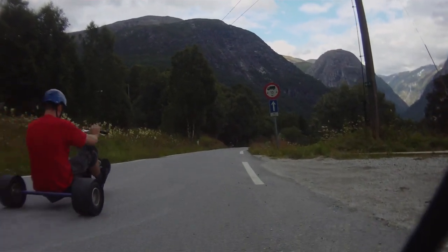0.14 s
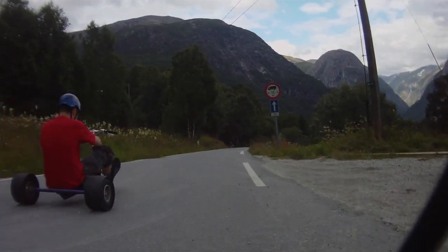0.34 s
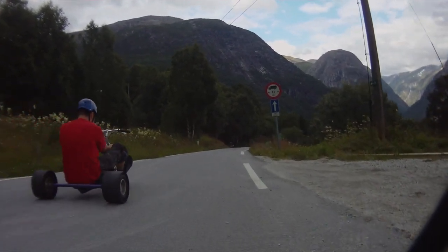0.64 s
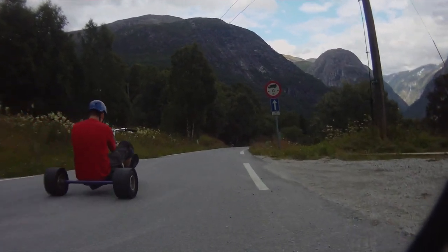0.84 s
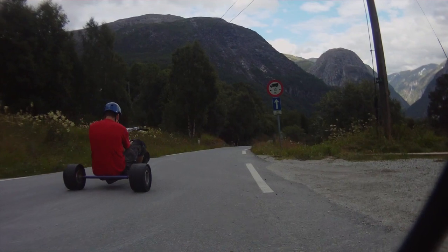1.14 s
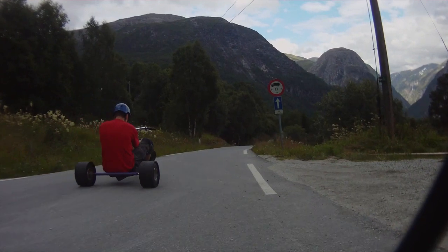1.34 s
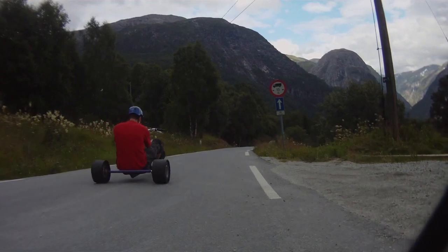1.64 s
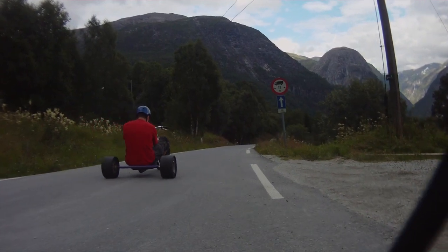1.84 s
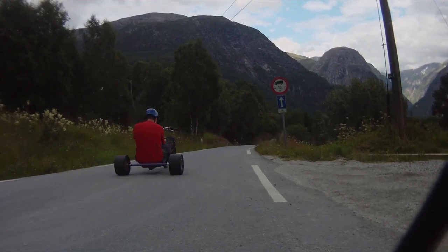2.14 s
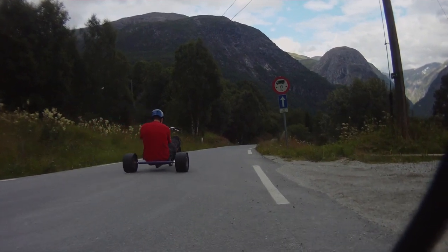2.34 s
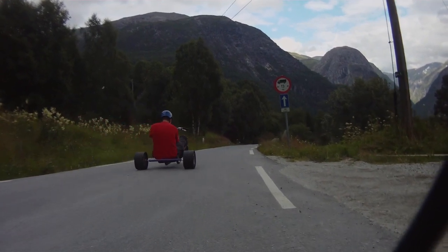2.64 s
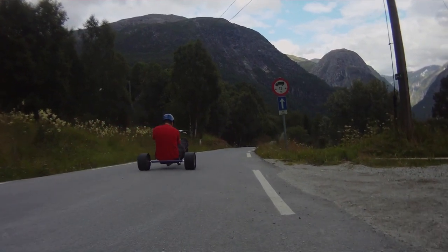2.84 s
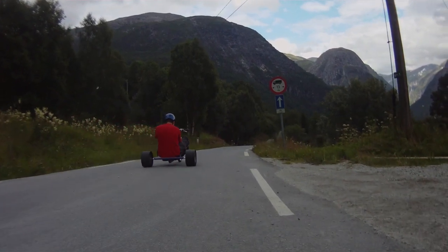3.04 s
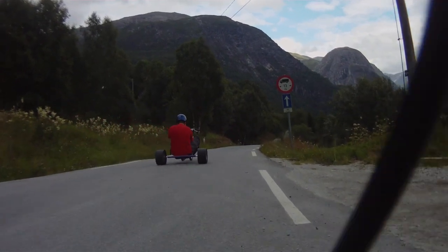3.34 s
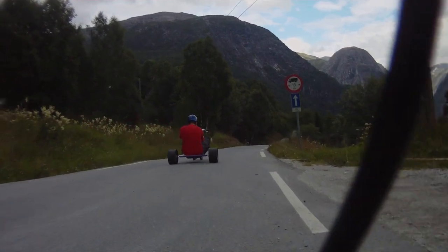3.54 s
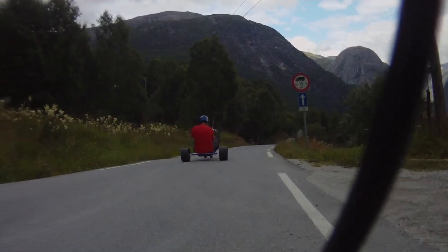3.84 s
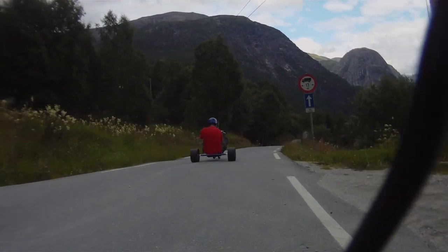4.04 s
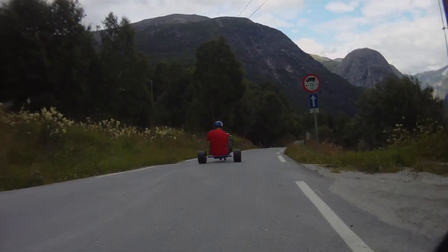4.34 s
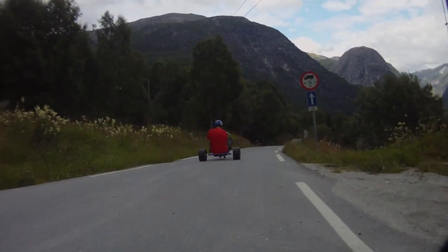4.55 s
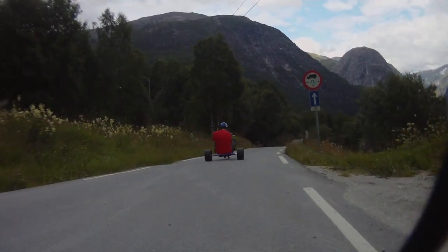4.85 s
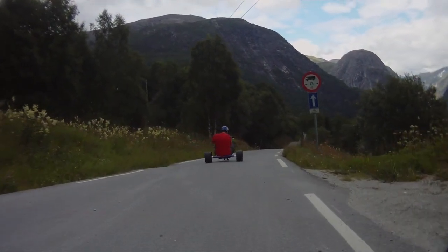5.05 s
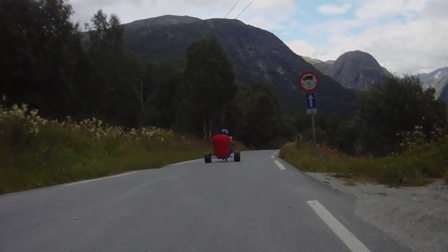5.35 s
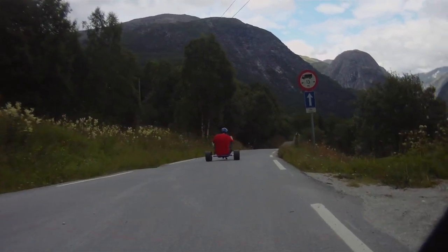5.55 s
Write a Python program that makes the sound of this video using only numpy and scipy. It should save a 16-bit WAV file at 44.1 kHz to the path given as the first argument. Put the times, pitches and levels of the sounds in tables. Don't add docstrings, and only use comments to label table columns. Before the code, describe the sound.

Close to the microphone, a loose camera rattles in a plastic housing on a small cart: dull knocks, middle-pitched clacks and bright ticks over fine buzz. Another cart's hollow plastic wheels ring ahead, fading by three seconds. After a burst near 3.6 seconds and a brief lull, the rattle turns loud and dense from four seconds, with hard snaps, above low frame thuds. Outdoors, dry, practically mono.

```python
import sys
import numpy as np
from scipy import signal
from scipy.fft import rfft, irfft
from scipy.io import wavfile
from scipy.ndimage import uniform_filter1d, map_coordinates

SR = 44100
rng = np.random.default_rng(int(sys.argv[2]) if len(sys.argv) > 2 else 0)


def nominal_scale(level):
    x = np.asarray(level, float) / 20
    return 10 ** x


def waveform_to_disk(signal):
    frames = np.transpose(np.atleast_2d(signal))
    scaled = np.clip(frames, -1, 1) * 32767
    samples = np.round(scaled).astype(np.int16)
    wavfile.write(sys.argv[1], SR, samples)


N = 251370
HIT = 3000


def rms_one(x):
    return x / np.sqrt(np.mean(x ** 2) + 1e-20)


def over_time(table):
    s, level = np.transpose(table)
    return np.interp(np.arange(N) / SR, s, level)


def drift(rate):
    r = np.exp(-80 * np.pi * rate / SR)
    noise = rng.standard_normal(N // 40 + 2002)
    slow = signal.lfilter([1], [1, -2 * r, r * r], noise)[2000:]
    return np.interp(np.arange(N) / 40, np.arange(len(slow)), rms_one(slow))


def resonate(x, hz, width_hz):
    r = np.exp(-np.pi * width_hz / SR)
    ring = [1, -2 * r * np.cos(2 * np.pi * hz / SR), r * r]
    return signal.lfilter(np.array([1, 0, -1]) * (1 - r * r) / 2, ring, x + 1e-18)


def between(x, low_hz, high_hz):
    return signal.sosfilt(signal.butter(3, [low_hz, high_hz], "band", fs=SR, output="sos"), x)


def body(x, modes, spread_db=0.):
    luck = rng.standard_normal((len(x), len(modes)))
    total = 0
    for k, (hz, width_hz, db) in enumerate(modes):
        strength = nominal_scale(db + spread_db * luck[:, [k]])
        total = total + (-1) ** k * strength * resonate(x, hz, width_hz)
    return total


def coloured(spectrum):
    hz, db = np.transpose(spectrum)
    bins = np.arange(N // 2 + 1) * SR / N + 1
    gain = nominal_scale(np.interp(np.log(bins), np.log(hz), db))
    return rms_one(irfft(rfft(rng.standard_normal(N)) * gain, N))


def grains(shape, per_s, spread_db):
    sizes = nominal_scale(spread_db * np.minimum(rng.exponential(1, shape), 4)) * rng.choice([-1, 1], shape)
    return sizes * (rng.random(shape) < per_s / SR)


def chatter(length_ms, per_s, rise_ms):
    ms = np.arange(HIT) * 1000 / SR
    spent = ms / np.maximum(length_ms, .3)[:, None]
    settle_db, settle_longer = -16.5, 3.2
    fade = np.exp(-spent ** 1.31) + nominal_scale(settle_db) * np.exp(-spent / settle_longer)
    touches = grains((len(length_ms), HIT), per_s, spread_db=3)
    touches[:, 12] += 2.5
    return touches * (1 - np.exp(-ms / rise_ms)) * fade


def lay_out(times, hits, peak_db):
    out = np.zeros(N + HIT)
    for s, hit, db in zip(times, hits, peak_db):
        at = round(s * SR)
        out[at:at + HIT] += nominal_scale(db) * hit / np.max(np.abs(hit))
    return out[:N]


# (frequency [Hz], level [dB])
HISS_COLOUR = [(180, -28), (300, 1.5), (1540, -25), (2790, -7), (3690, -24), (15500, -29)]


def hiss():
    return nominal_scale(-62) * coloured(HISS_COLOUR)


# (time [s], level [dB])
LURCHES = [(1.93, -62), (2.75, -57), (2.98, -61), (3.59, -56), (4.09, -61), (4.21, -53), (4.32, -49),
           (4.67, -55), (5.13, -52), (5.3, -53), (5.6, -55)]


def sway_level(shake_db):
    s, db = np.transpose(LURCHES)
    late = np.arange(N) / SR - s[:, None]
    rise_s, fade_s = 0.042, 0.043
    swells = nominal_scale(db)[:, None] * np.exp(np.minimum(late / rise_s, -late / fade_s))
    bed = nominal_scale(-72 + .7 * (shake_db + 50.5))
    return bed + swells.sum(axis=0)


# (frequency [Hz], level [dB])
DRONE_COLOUR = [(35, -37), (60, -8), (102, -10), (262, -4), (355, -6.5), (450, 0.5), (580, -11),
                (990, -120)]


def rumble(shake_db):
    sway = rms_one(resonate(resonate(rng.standard_normal(N), 48, 20), 48, 36))
    drone_db = -58 + 0.89 * (shake_db + 49.5) + 3.0 * drift(30)
    return sway_level(shake_db) * sway + nominal_scale(drone_db) * coloured(DRONE_COLOUR)


# (time [s], peak level [dB], pitch [Hz])
THUDS = [(0.059, -44, 132), (0.115, -41, 285), (0.285, -47, 218), (0.459, -49, 215), (0.823, -52, 245),
         (1.097, -51, 250), (1.166, -45, 301), (1.381, -50, 301), (2.427, -47, 285), (2.696, -45, 316),
         (2.956, -44, 72.7), (3.111, -48, 175), (3.397, -46, 280), (3.639, -41.5, 304), (3.745, -44, 202),
         (3.959, -45, 250), (4.493, -42, 291), (4.872, -42, 318), (4.956, -40, 288),
         (3.098, -35, 140)]


def thuds():
    s, peak_db, hz = np.transpose(THUDS)
    pushes = chatter(np.full(len(s), 8.), per_s=900, rise_ms=3.8)
    struck = np.array([resonate(push, f, 63) for push, f in zip(pushes, hz)])
    frame_modes = [(60.4, 26, -5.0), (126, 21, -0.5), (250, 115, -6.0), (400, 190, -13)]   # Hz, width Hz, dB
    frame = body(pushes, frame_modes, spread_db=2.5)
    return lay_out(s - .003, frame + nominal_scale(4.5) * struck, peak_db + 2.5)


# (time [s], level [dB])
WHEEL_ROAR = [
    (0, -57),
    (.4, -54),
    (1.2, -53),
    (1.7, -55.5),
    (2.4, -64),
    (2.9, -72),
    (5.7, -90),
]
# (pitch [Hz], width [Hz], level [dB])
WHEEL_MODES = [(2580, 100, -6), (3710, 250, 1), (4400, 500, -10), (6000, 400, -15), (7100, 500, -17),
               (8380, 120, -20)]


def cart_ahead():
    grit = grains(N, 6000, spread_db=2.5) * nominal_scale(1.5 * drift(30))
    rings = 0
    for hz, width_hz, db in WHEEL_MODES:
        rings = rings + nominal_scale(db) * rms_one(resonate(resonate(grit, hz, width_hz), hz, width_hz))
    t = np.arange(N) / SR
    pull_away_m_s2, sound_m_s = 2.5, 343
    sent = t - pull_away_m_s2 * t ** 2 / 2 / sound_m_s
    return nominal_scale(over_time(WHEEL_ROAR)) * map_coordinates(rings, [sent * SR], order=3)


def patter(modes, per_s, clumps, low_hz, high_hz):
    touches = grains(N, per_s * nominal_scale(3 * drift(50)), spread_db=3.5) * clumps
    rings = 0
    for k, (hz, width_hz, db) in enumerate(modes):
        luck = nominal_scale(4.33 * rng.standard_normal(N))
        rings = rings + (-1) ** k * nominal_scale(db) * resonate(touches * luck, hz, width_hz)
    return rms_one(between(rings, low_hz, high_hz))


# (pitch [Hz], width [Hz], level [dB])
SHELL = [(554, 132, -1.5), (645, 74, 1), (845, 100, -3)]
MIDDLE = [(1265, 184, -7.5), (1499, 140, 2), (1600, 89, -0.5), (1944, 206, -7.5), (2207, 92, 1),
          (2530, 224, -4.5)]
UPPER = [(3106, 240, 4), (3557, 290, 1.5), (3786, 340, 1), (4202, 330, -2)]
TOP = [(4780, 590, -7.5), (5485, 130, 2), (5980, 810, -1.5), (7370, 410, -7), (8015, 300, -7.5),
       (9780, 2100, -18.5), (12600, 3700, -23)]


def buzz(shake_db):
    clumps = nominal_scale(3.0 * drift(30) + 1.3 * drift(5.2))
    shell = nominal_scale(-4.5) * patter(SHELL, 1300, clumps, 295, 1800)
    middle = nominal_scale(-5.5) * patter(MIDDLE, 1300, clumps, 830, 4160)
    upper = nominal_scale(-8.5) * patter(UPPER, 1500, clumps, 2240, 5200)
    top = nominal_scale(-16.5) * patter(TOP, 2000, clumps, 3600, 12600)
    return nominal_scale(shake_db + 0.7) * (shell + middle + upper + top)


# (start [s], end [s], level [dB])
RUBS = [(2.936, 3.05, -52.5), (3.094, 3.125, -54), (3.213, 3.57, -52), (3.556, 3.746, -66),
        (4.297, 4.587, -53.5), (4.808, 4.9, -58), (5.034, 5.24, -57)]
# (pitch [Hz], width [Hz], level [dB])
RUB_MODES = [(2300, 500, 1), (3300, 700, 1), (4900, 720, -3), (5600, 190, -9), (6340, 640, 2),
             (8600, 400, -6), (9700, 600, -9), (12500, 4000, -29)]


def rubbing():
    t = np.arange(N) / SR
    pressure = sum(nominal_scale(db) * (t > start) * (t < end) for start, end, db in RUBS)
    slips = grains((1, N), 3500, spread_db=3.0) * nominal_scale(2.5 * drift(30))
    scrape = rms_one(between(body(slips, RUB_MODES), 1500, 11200)[0])
    return uniform_filter1d(pressure, size=1300) * scrape


# (time [s], peak level [dB])
PINGS = [(0.0695, -33.5), (0.1207, -36), (0.4848, -33.5), (0.5082, -40), (0.5494, -42), (0.6566, -34.5),
         (0.9896, -40), (1.2604, -40), (1.8814, -41), (2.0674, -37), (2.1782, -36), (2.27, -38),
         (2.3446, -50), (2.4314, -42), (2.4834, -44), (2.572, -40), (2.6664, -37.5), (2.6873, -42),
         (2.825, -35.5), (3.1812, -46), (3.6331, -29), (4.2727, -39), (4.8174, -31),
         (0.5786, -43), (0.6908, -41), (0.8804, -46), (1.1413, -46), (1.2271, -41), (1.3034, -47),
              (1.4646, -45), (1.503, -44), (1.6312, -47), (1.6856, -49), (1.7075, -43), (1.8128, -49),
              (1.8317, -48), (2.0832, -40), (2.9595, -34.5), (3.0225, -35.5), (3.0624, -50), (3.244, -39),
              (3.5019, -37), (3.684, -41), (3.7194, -45), (3.8424, -38.5), (3.9305, -46), (3.9544, -47),
              (3.9609, -43)]


def pings():
    s, peak_db = np.transpose(PINGS)
    blows = chatter(np.full(len(s), 3.5), per_s=2200, rise_ms=0.2)
    rings = between(body(blows, UPPER + TOP, spread_db=7.5), 3300, 11500)
    return lay_out(s - .0005, rings, peak_db + 1.5)


# (time [s], peak level [dB], brightness [dB])
SNAPS = [(3.1994, -22, -14), (3.5719, -15, 2), (4.1452, -12.5, -3), (4.3112, -5.5, 3), (4.7585, -19, -3),
         (4.8975, -22, -2), (5.189, -23, -9)]


def snaps():
    s, peak_db, bright_db = np.transpose(SNAPS)
    touch = np.zeros((len(s), HIT))
    touch[:, 0] = 1
    bright = nominal_scale(bright_db)[:, None] * body(touch, [(6450, 2000, -10.0), (10500, 3100, -22)])
    return lay_out(s, resonate(touch, 1960, 600) - bright, peak_db)


# (time [s], peak level [dB], pitch [Hz])
KNOCKS = [(0.062, -30, 603), (0.098, -26.5, 693), (0.387, -39.5, 620), (0.404, -23.5, 610),
          (0.714, -36, 480), (0.744, -38, 604), (0.837, -38, 610), (0.905, -28.5, 632),
          (1.106, -35, 683), (1.175, -36, 859), (1.392, -33.5, 540), (1.92, -39.5, 623),
          (2.119, -32, 654), (2.378, -33, 860), (2.521, -43, 466), (2.65, -42, 630),
          (2.709, -28, 620), (2.755, -41, 806), (2.809, -39, 490), (2.857, -28.5, 620),
          (3.102, -38, 514), (3.118, -33, 764), (3.198, -36.5, 494), (3.467, -34, 610),
          (3.559, -19, 820), (3.753, -34.5, 560), (4.073, -25.5, 1047), (4.107, -26, 690),
               (4.144, -27.5, 460), (4.194, -27.5, 694), (4.242, -25.5, 960), (4.265, -27, 684),
               (4.303, -24, 615), (4.33, -22.5, 680), (4.443, -27.5, 696), (4.527, -34, 656),
               (4.612, -28, 890), (4.654, -21.5, 630), (4.759, -37, 523), (4.778, -31.5, 910),
               (4.81, -31, 600), (4.83, -28, 670), (4.851, -18, 660), (4.96, -35, 690), (5.028, -27, 845),
               (5.109, -30.5, 845), (5.293, -24.5, 646), (5.331, -39, 940), (5.345, -31, 920),
               (5.45, -31, 650), (5.534, -28.5, 687), (5.578, -31, 870), (5.605, -21.5, 600),
          (0.496, -34.5, 554), (2.723, -32, 630), (2.984, -37, 786), (3.644, -35, 533),
            (4.867, -25.5, 664), (5.355, -27, 926), (5.543, -24, 740), (5.619, -26, 604), (5.632, -24, 640),
          (1.119, -38.5, 627), (1.195, -38, 848), (4.015, -38, 611), (4.039, -39, 660),
                (4.323, -27, 614), (4.336, -23, 860), (4.35, -29, 740), (4.362, -26, 690),
                (4.379, -29, 880), (4.409, -31, 1070), (4.5, -37, 692), (4.977, -32.5, 902)]


def knocks():
    s, peak_db, hz = np.transpose(KNOCKS)
    blows = chatter(np.full(len(s), 5.5), per_s=1200, rise_ms=.4)
    struck = np.array([resonate(blow, f, 85) for blow, f in zip(blows, hz)])
    shell = nominal_scale(-7.5) * body(blows, SHELL, spread_db=5.5)
    return lay_out(s - .0015, between(struck + shell, 407, 1860), peak_db + 3.0)


def camera_hits(s, length_ms, middle_db, upper_db, top_db, landing_hz):
    uneven = np.exp(0.18 * rng.standard_normal(len(s)))
    blows = chatter(length_ms * uneven, per_s=3500, rise_ms=0.87)
    s = s - .0016
    first = blows * np.exp(-np.arange(HIT) / SR / 0.018)
    struck = np.array([resonate(blow, f, 150) for blow, f in zip(blows, landing_hz)])
    lands_high = landing_hz[:, None] > UPPER[0][0]
    middle = body(blows, MIDDLE, spread_db=4.5) + nominal_scale(12) * struck * ~lands_high
    upper = body(blows, UPPER, spread_db=2) + nominal_scale(2.0) * struck * lands_high
    top = body(first, TOP, spread_db=5.0)
    top_db = np.minimum(top_db, -27)
    return (lay_out(s, between(middle, 780, 3050), middle_db)
            + lay_out(s, between(upper, 2350, 4930), upper_db)
            + lay_out(s, between(top, 4000, 12800), top_db))


# (time [s], peak level [dB], pitch [Hz], brightness [dB])
CLACKS = [(0.117, -23.5, 1540, -20), (0.2233, -27, 2340, -7.5), (0.405, -26.5, 1510, -4),
          (0.7447, -35, 2190, -16), (0.9052, -28.5, 1270, -24), (0.9208, -29, 2140, -12),
          (1.0038, -31.5, 1500, -18), (1.1025, -29, 2150, -19.5), (1.1752, -36.5, 1540, -20),
          (1.1944, -37.5, 1510, -18), (1.392, -32, 1560, -10), (1.4267, -29.5, 2520, -13),
          (1.5471, -21, 2200, -17.5), (1.73, -34.5, 1460, -20), (1.912, -30.5, 1320, -18),
          (2.0105, -32.5, 2390, -7.5), (2.0443, -38.5, 1460, -25), (2.1178, -27.5, 2440, -19),
          (2.5196, -32, 1520, -33), (2.652, -26.5, 2260, -27), (2.698, -28, 2200, -25),
          (2.8562, -25, 1516, -18.5), (2.9618, -32, 2380, -12), (3.1043, -36, 2170, -14),
          (3.1134, -33, 2280, -15.5), (3.159, -35, 2200, -23), (3.198, -33, 1540, -30),
          (3.374, -32, 2440, -20), (3.4165, -32, 1510, -17), (3.501, -33.5, 1350, -16),
          (3.802, -29.5, 2490, -11), (3.938, -31.5, 2270, -22), (4.0746, -22.5, 1460, -16.5),
               (4.0964, -32, 2180, -16), (4.1275, -22, 2190, -21), (4.147, -22, 1500, -23),
               (4.193, -22.5, 1380, -16), (4.2296, -27, 2120, -18), (4.2477, -15.5, 2460, -17),
               (4.3099, -18.5, 2180, -11), (4.3335, -18, 1390, -23), (4.3514, -24, 2220, -17),
               (4.4071, -24, 1484, -27), (4.4438, -23.5, 1340, -26), (4.532, -29, 1500, -17),
               (4.631, -30, 1480, -16), (4.759, -29, 1550, -25), (4.777, -41, 1540, -25),
               (4.806, -18, 2200, -22), (4.8957, -26.5, 1560, -20), (5.0266, -32, 1310, -28),
               (5.0298, -23.5, 1450, -25), (5.2193, -37, 1660, -20), (5.6036, -18.5, 1480, -24.5),
               (5.381, -23, 1460, -30), (5.614, -21.5, 1500, -30), (4.037, -35, 1500, -30),
               (5.6315, -21, 1440, -24)]
# (time [s], peak level [dB], brightness [dB])
TICKS = [(0.041, -36, -8), (0.092, -26, -22), (0.174, -34.5, -6), (0.2068, -38, -7),
         (0.3023, -27, -18), (0.3496, -35.5, -6.5), (0.3844, -34.5, -14), (0.415, -26, -19),
         (0.4697, -33, -16), (0.5338, -29.5, -11), (0.6469, -32.5, -12), (1.245, -30.5, -13),
         (1.767, -35.5, -8.5), (1.976, -41, -12), (2.1403, -36, -11), (2.2032, -35.5, -17),
         (2.2388, -36, -13.5), (2.2927, -35.5, -7), (2.376, -20.5, -21.5), (2.4705, -35, -14),
         (2.6329, -39, -19), (2.7522, -38.5, -9), (2.808, -43, -2.5), (2.8928, -38, -17),
         (2.9364, -36, -14), (2.9798, -30.5, -11.5), (3.0465, -35, -19), (3.2859, -33.5, -16),
         (3.333, -37, -20), (3.3488, -30.5, -22),
         (3.559, -19.5, -20), (3.5688, -17, -15.5), (3.6085, -36, -10), (3.6226, -26, -17),
              (3.6561, -32, -6), (3.825, -31, -14), (3.8646, -36, -7), (4.066, -25, -11), (4.192, -30, -14),
              (4.2996, -21.5, -6), (4.362, -21.5, -23), (4.3844, -20.5, -23), (4.4512, -25.5, -20),
              (4.6115, -24, -14.5), (4.655, -19, -20.5), (4.8488, -18.5, -17), (4.956, -23.5, -17.5),
              (4.988, -30, -14), (5.2832, -19, -15.5), (5.333, -26, -19), (5.3447, -22, -17.5),
              (5.376, -21, -21.5), (5.4153, -27.5, -25), (5.4318, -28.5, -17), (5.441, -26.5, -16.5),
              (5.4949, -22.5, -13.5), (5.5336, -23, -23), (5.5522, -31, -13), (5.6031, -25.5, -17),
              (5.614, -28.5, -15.5),
         (.9434, -39, -10), (.9894, -35, -18), (1.0614, -41, -14), (1.097, -34, -18),
               (1.256, -37.5, -11), (1.2654, -35, -16), (3.2427, -39, -13), (3.2946, -34, -17),
               (4.033, -38, -20), (4.058, -32, -21), (4.0712, -27, -17), (4.123, -30.5, -16),
               (4.211, -34, -9), (4.2415, -22.5, -16), (4.272, -33, -12), (4.334, -26, -20),
               (4.3784, -21, -24), (4.4697, -28.5, -16), (4.8164, -28, -18), (4.8244, -28.5, -22),
               (4.8387, -30, -20), (4.9173, -40, -15), (4.9615, -26, -18), (4.9774, -31.5, -16),
               (5.232, -37.5, -24), (5.296, -33, -20), (5.3555, -32, -22), (5.369, -27, -24),
               (5.388, -28, -24), (5.49, -31, -20), (5.544, -26.5, -16), (5.599, -31, -22),
               (5.677, -36.5, -16), (5.686, -35, -17)]


def camera_contacts():
    run_ms, crest_db = 3.7, 7
    s, db, hz, bright_db = np.transpose(CLACKS)
    clacks = camera_hits(s, np.full(len(s), run_ms), db, db - 4, db + bright_db + crest_db, hz)
    s, db, bright_db = np.transpose(TICKS)
    length_ms = run_ms + 3 * (s * SR / N) ** 9
    edge_hz = np.full(len(s), 3800)
    return clacks + camera_hits(s, length_ms, db - 5, db + 0.21, db + bright_db + crest_db, edge_hz)


# (time [s], level [dB])
ROAD_SHAKE = [(0, -49.5), (.59, -47), (1.87, -49.5), (2.7, -51.5), (2.97, -43), (3.32, -48.5),
              (3.59, -37.5), (3.89, -50.5), (4.14, -38), (4.21, -39.5), (4.29, -35), (4.44, -42),
              (5.3, -44), (5.43, -42), (5.7, -45)]


def scene():
    shake_db = over_time(ROAD_SHAKE)
    background = hiss() + rumble(shake_db) + thuds() + cart_ahead()
    housing = buzz(shake_db) + rubbing() + pings() + snaps() + knocks() + camera_contacts()
    mono = background + housing
    return np.array([mono, mono])


def band_limit(x):
    return signal.sosfilt(signal.butter(12, 15990, fs=SR, output="sos"), x)


def record(dry):
    unlike = between(rng.standard_normal(N), 4800, 21000)
    stereo = dry + nominal_scale(-76) * unlike * [[1], [-1]]
    top_cut = signal.ellip(6, 1, 30, 15400, fs=SR, output="sos")
    return band_limit(signal.sosfilt(top_cut, stereo))


dry = scene()
out = record(dry)
waveform_to_disk(out)
```